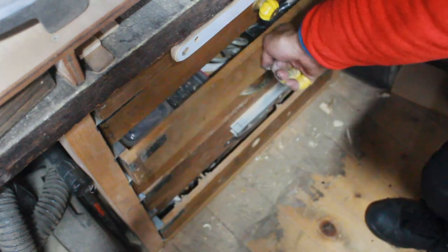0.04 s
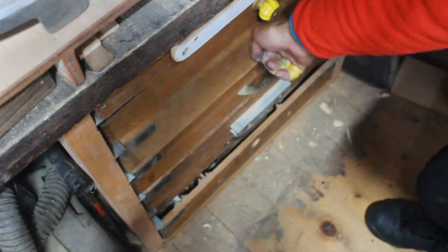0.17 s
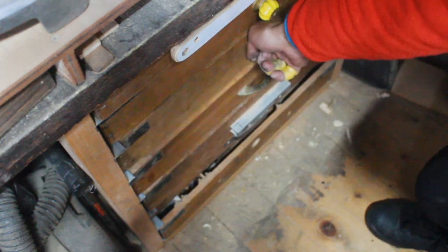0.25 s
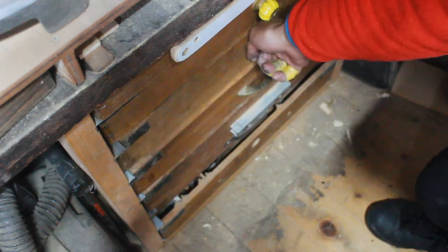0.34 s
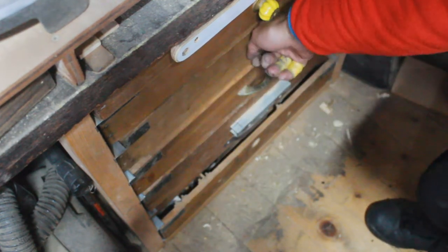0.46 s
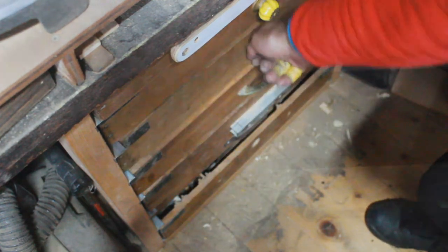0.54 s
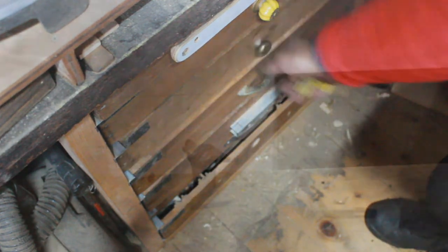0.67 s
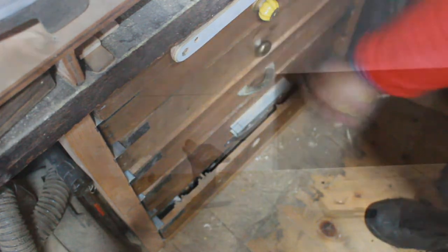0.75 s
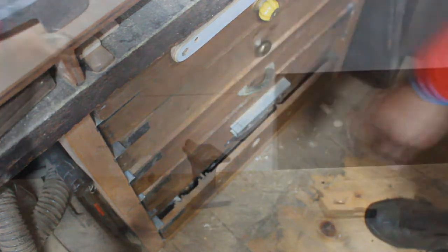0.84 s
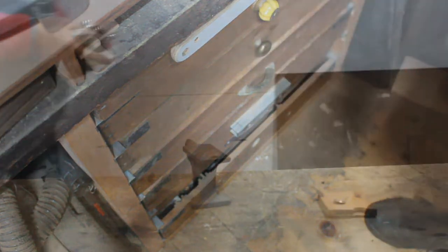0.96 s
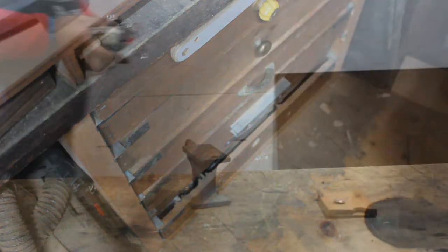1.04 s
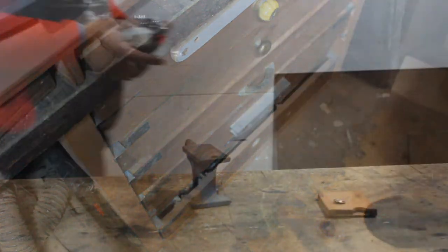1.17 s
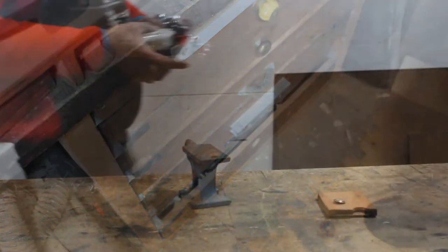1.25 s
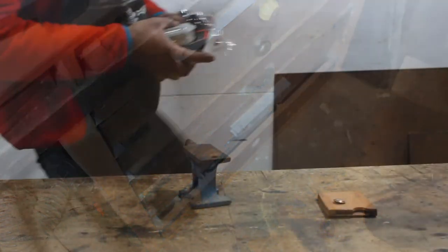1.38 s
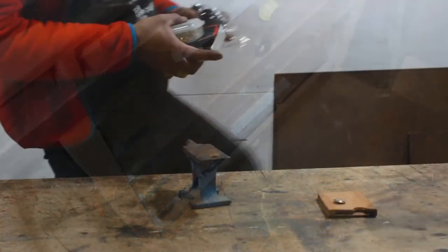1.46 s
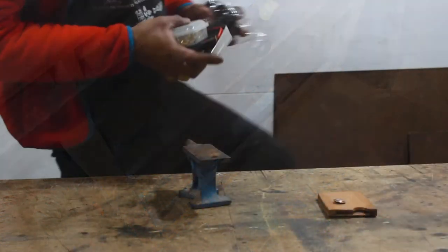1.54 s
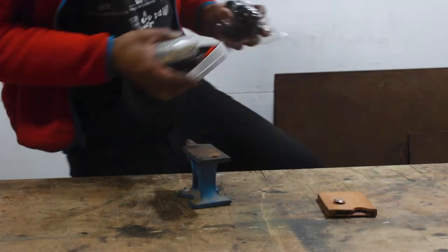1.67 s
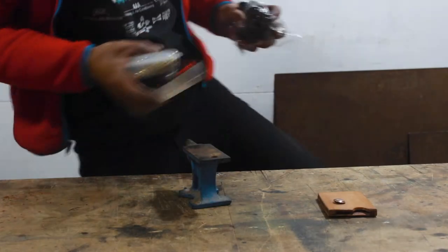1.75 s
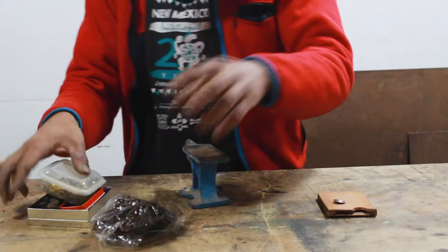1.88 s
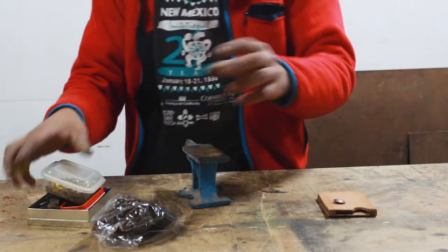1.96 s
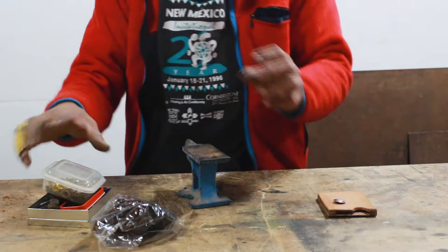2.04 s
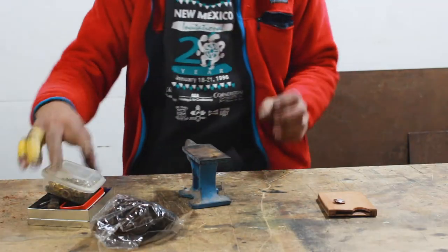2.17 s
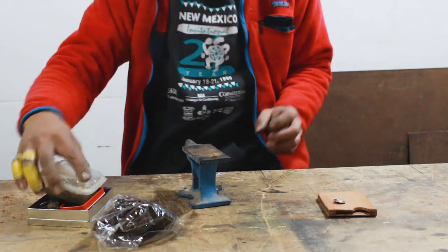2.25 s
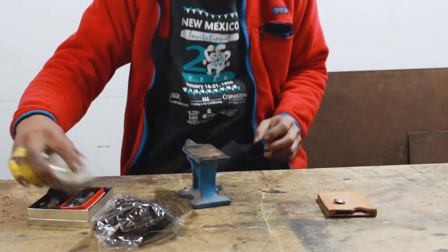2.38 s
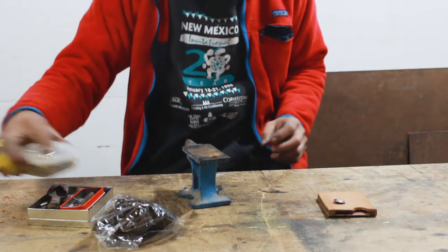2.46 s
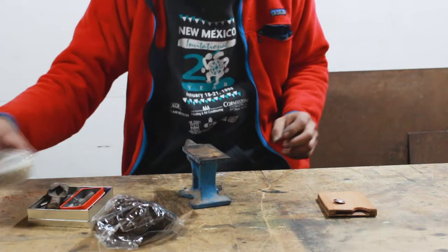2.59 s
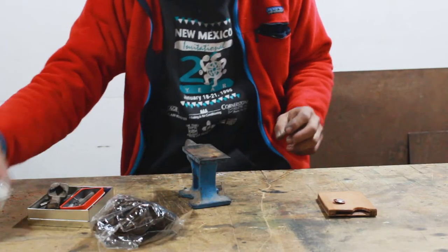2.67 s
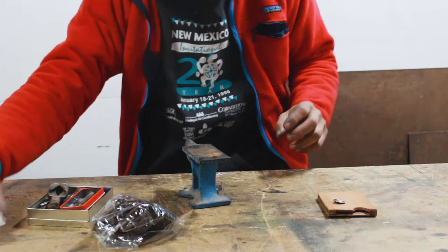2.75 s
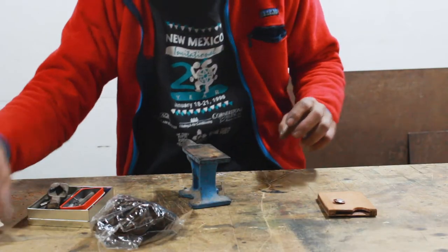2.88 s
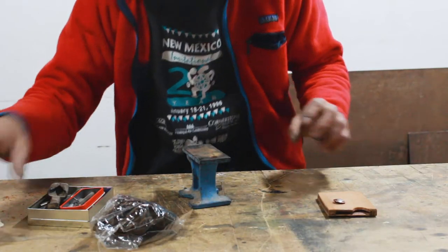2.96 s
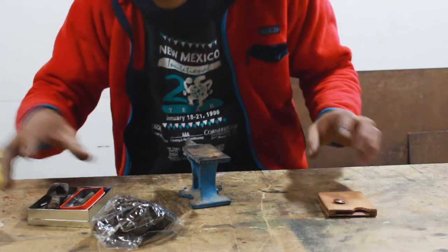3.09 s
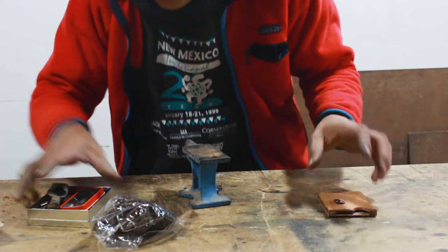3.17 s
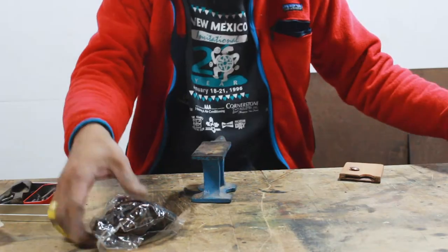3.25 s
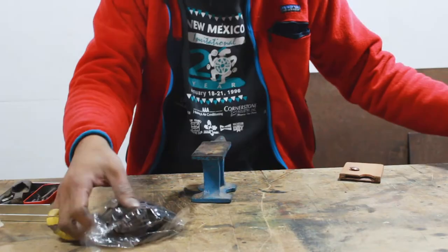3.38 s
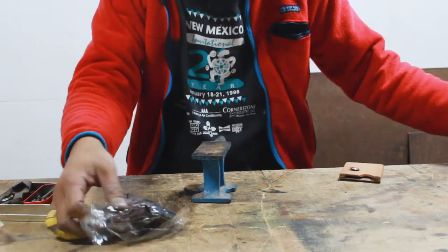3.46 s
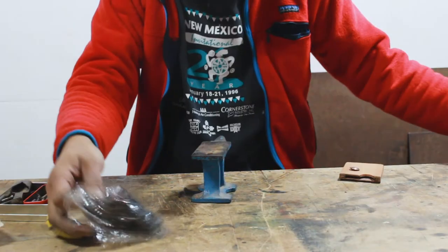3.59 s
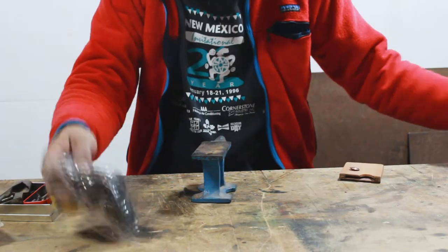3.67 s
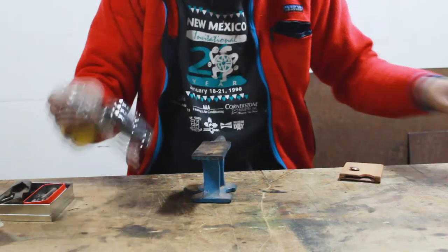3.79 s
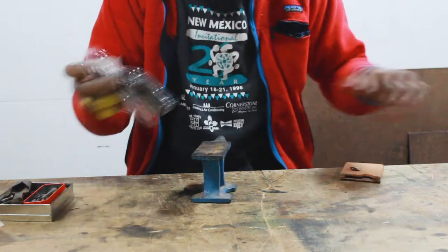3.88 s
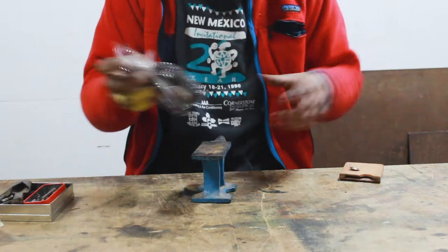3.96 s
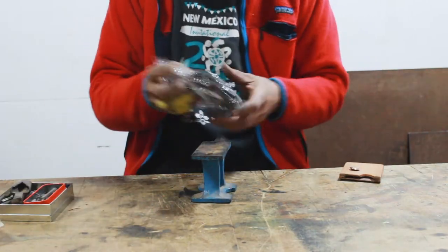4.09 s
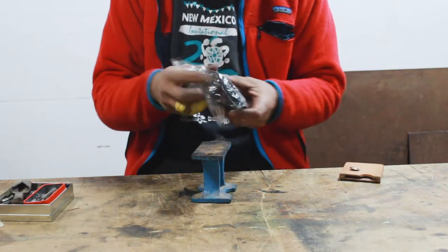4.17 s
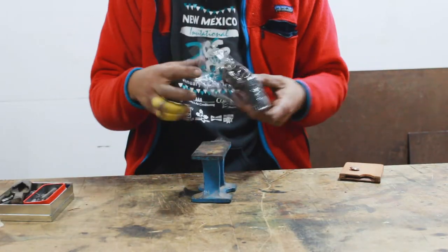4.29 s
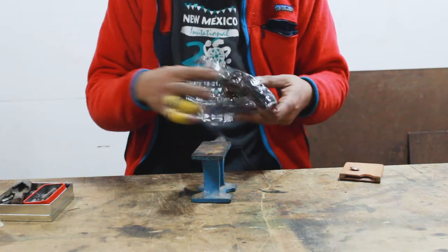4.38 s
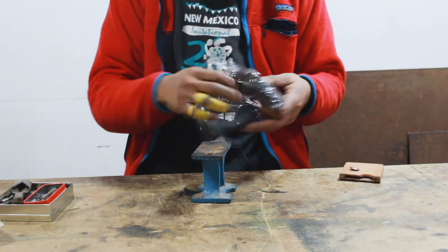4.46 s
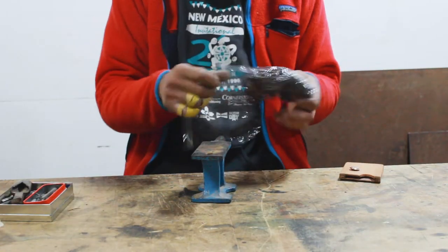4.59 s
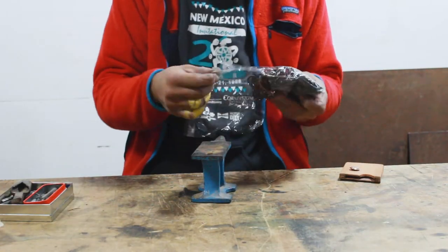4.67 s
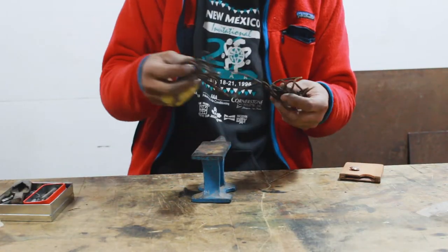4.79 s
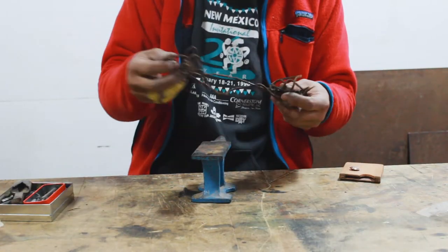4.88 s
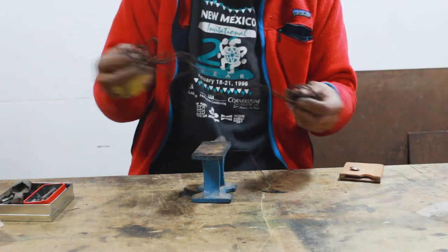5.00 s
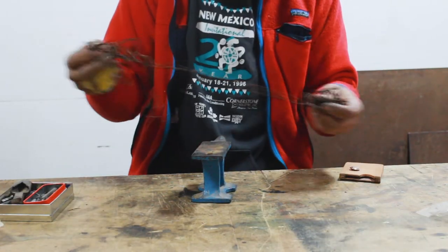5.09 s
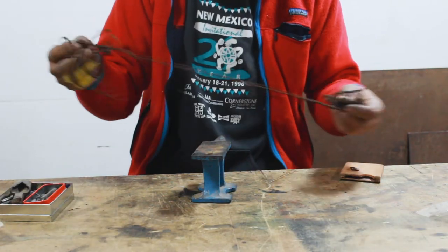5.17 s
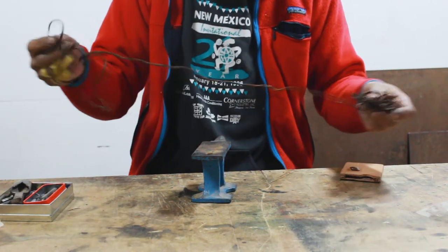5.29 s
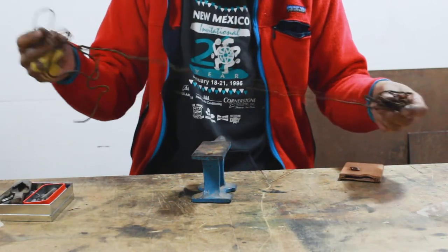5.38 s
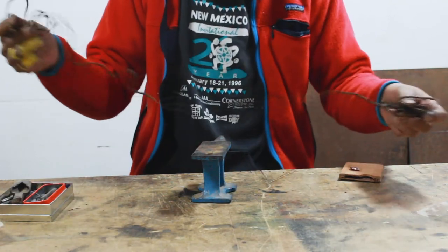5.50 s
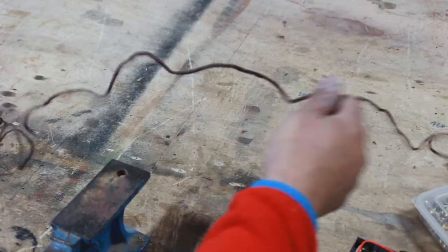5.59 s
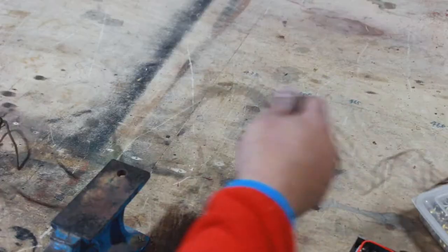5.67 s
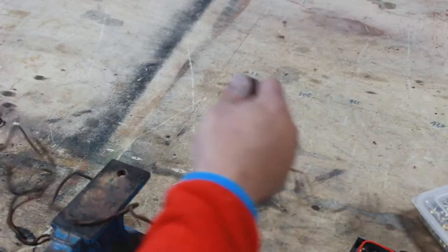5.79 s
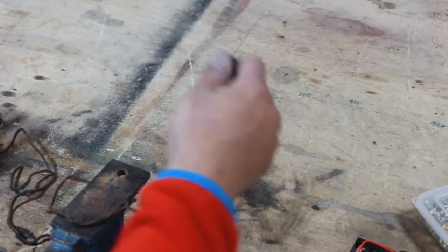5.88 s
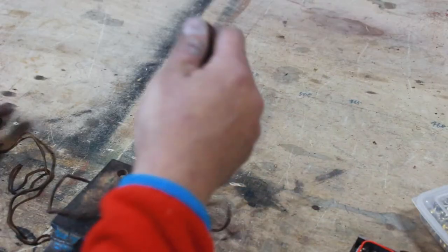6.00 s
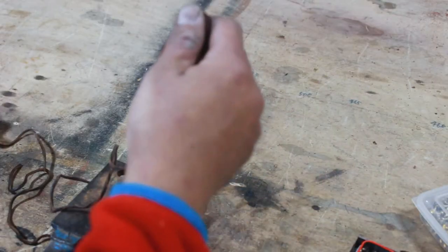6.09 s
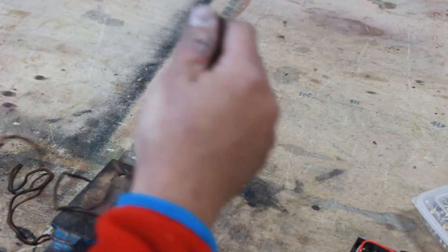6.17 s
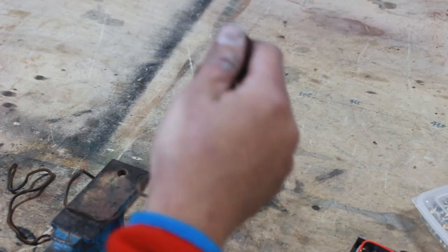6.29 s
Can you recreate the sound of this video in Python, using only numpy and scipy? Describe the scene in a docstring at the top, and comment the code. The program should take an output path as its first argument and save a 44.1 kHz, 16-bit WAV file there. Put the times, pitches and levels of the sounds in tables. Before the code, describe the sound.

A wooden drawer scrapes briefly and bumps shut, shaking the tools inside. Plastic crackles, sleeves brush and small boxes of metal parts rattle as they are set down, one hitting the workbench with a loud bang. A plastic bag is then crumpled open and stops abruptly. Last, a cord is drawn out with faint swishes and ticks. The handling sounds close, in a small workshop with low room noise.

```python
"""A small workshop. A wooden drawer scrapes along its runners and bumps shut, shaking its tools (0-0.3 s).
From 1 s plastic crackles, sleeves brush and boxes of metal parts are put down; one bangs the bench
and clips (2.8 s). After a brief dropout (3.25 s) a plastic bag is crumpled open, its creases buckling,
until crumpling and room tail stop abruptly (4.75 s). Last, a cord is drawn out and laid down.
Low room noise runs throughout."""
import sys
import numpy as np
from scipy import signal
from scipy.fft import rfft, irfft, next_fast_len
from scipy.io import wavfile
from scipy.ndimage import uniform_filter1d

SR = 44100
rng = np.random.default_rng(int(sys.argv[2]) if len(sys.argv) > 2 else 0)


def to_wav(sig):
    """Store sig (one row per channel, or 1-D mono) as 16-bit WAV at the path in sys.argv[1].

    Samples outside -1..1 are clipped; the rate is SR.
    """
    pcm = np.clip(np.atleast_2d(sig), -1, 1) * 32767
    pcm = np.round(pcm).astype(np.int16)
    wavfile.write(sys.argv[1], SR, pcm.T)  # frames by channels


N = 279594
TIME = np.arange(N) / SR
AGE = np.arange(16000) / SR  # s since an impact
DROPOUT_S, CRUMPLE_END_S = (3.252, 3.277), 4.752
TOP_HZ = 16200


def amp(db):
    """Decibels to gain."""
    return 10 ** (np.asarray(db) / 20)


def unit(x):
    """Scale to rms 1."""
    return x / np.sqrt(np.mean(x ** 2) + 1e-20)


def along(points, hz):
    """Interpolate (f/Hz, value) points on a log axis."""
    f, values = np.transpose(points)
    return np.interp(np.log(hz + 1), np.log(f + 1), values)


def colour(x, spectrum):
    """Minimum-phase filter shaped by (f/Hz, level/dB) points; output rms 1."""
    size = 4096
    gain = amp(along(spectrum, np.fft.rfftfreq(size, 1 / SR)))
    cepstrum = irfft(np.log(gain + 1e-6))
    cepstrum[1:size // 2] *= 2
    cepstrum[size // 2 + 1:] = 0
    response = irfft(np.exp(rfft(cepstrum)))
    return unit(signal.fftconvolve(x, response)[:len(x)])


def hiss(spectrum, size):
    """Coloured noise, rms 1."""
    padded = next_fast_len(size)
    gain = amp(along(spectrum, np.fft.rfftfreq(padded, 1 / SR)))
    return unit(irfft(rfft(rng.standard_normal(padded)) * gain, padded)[:size])


def fade(t60_s):
    """Free decay."""
    return np.exp(-np.log(1000) * AGE / t60_s)


def ring(modes, scatter_db, pitch=1):
    """Damped modes, strengths scattered per strike."""
    out = np.zeros(len(AGE))
    for k, (hz, db, t60_s) in enumerate(modes):
        strength = (-1) ** k * amp(db + scatter_db * rng.standard_normal())
        out += strength * fade(t60_s) * np.sin(2 * np.pi * hz * pitch * AGE)
    return out


def grains(rate_hz, spread_db, size):
    """Random micro-impacts, a few much larger than the rest."""
    chance, strength = rng.uniform(-1, 1, size), rng.standard_normal(size)
    return (np.abs(chance) < rate_hz / SR) * np.sign(chance) * amp(spread_db * np.minimum(strength, 2))


def snaps(rate_hz, spread_db, clump_db):
    """Micro-impacts in clumps of a few tens of ms; rms 1."""
    clumps = np.interp(TIME * 50, np.arange(N // 400), rng.standard_normal(N // 400))
    return unit(grains(rate_hz, spread_db, N) * amp(clump_db * clumps))


def burst(spectrum, t60_s):
    """Dying spray of micro-impacts, whitened, then coloured; initial rms about 1."""
    spray = rfft(rng.standard_normal(len(AGE)) * fade(t60_s))
    white = irfft(spray / (np.abs(spray) + 1e-12)) * fade(4 * t60_s)
    return colour(white, spectrum) * np.sqrt(np.mean(fade(t60_s) ** 2))


def add(track, t_s, sound):
    """Mix sound into track at t_s."""
    part = track[round(t_s * SR):][:len(sound)]
    part += sound[:len(part)]


# film crackle spectrum: f/Hz, level/dB
FILM_SPECTRUM = [(790, -31), (1350, -2.5), (1450, -6), (2200, -2), (3460, -3.5), (4080, -2), (9540, -10),
                 (13600, -18.5), (16000, -25.5)]
# bag body spectrum: f/Hz, level/dB
BAG_SPECTRUM = [(120, -65), (200, -12.5), (274, -4), (404, -9.5), (461, 0.5), (557, -4), (1150, -4.5),
                (1500, -51), (2530, -120)]
def crinkle():
    """Squeezed plastic snaps broadband; creases of each size buckle in clumps; the bag's body follows."""
    crackle_gain, body_gain = squeezing()
    sharp = snaps(rate_hz=170, spread_db=5, clump_db=-1)
    edges_hz = np.geomspace(1000, TOP_HZ, 6)
    creases = np.zeros(N)
    for band_hz in zip(edges_hz, edges_hz[1:]):
        band = signal.butter(2, band_hz, "band", fs=SR, output="sos")
        creases += signal.sosfilt(band, snaps(rate_hz=800, spread_db=1.5, clump_db=2.5))
    film = colour(amp(-5.5) * sharp + unit(creases), FILM_SPECTRUM)
    dense = snaps(rate_hz=2500, spread_db=4, clump_db=3.1)
    body = colour(sharp + amp(4.5) * dense, BAG_SPECTRUM)
    return amp(-2.5) * crackle_gain * film + amp(-3) * body_gain * body


# finger squeezes: t/s, hold/s, crackle level/dB, body level/dB
FILM_SQUEEZES = [(1.08, 0.027, -23.5, -33), (1.221, 0.057, -29, -33), (1.315, 0.084, -33, -37),
                 (1.443, 0.011, -39.5, -41), (2.552, 0.12, -34, -46.5), (2.68, 0.015, -34.5, -51),
                 (3.324, 0.047, -25, -38.5), (3.367, .2, -23, -36.5), (3.587, 0.13, -27, -30.5),
                 (3.708, 0.051, -25, -34.5), (3.83, .06, -32.5, -54), (3.907, 0.037, -25, -38.5),
                 (4.048, 0.012, -31.5, -44.5), (4.126, 0.046, -27.5, -38), (4.162, 0.055, -19.5, -30),
                 (4.31, 0.31, -25.5, -33), (4.453, 0.091, -21.5, -27), (4.60, 0.085, -28, -32),
                 (4.70, 0.02, -27, -30)]
def squeezing():
    """Crackle and body gains: force builds, sags as the film yields, dies on release."""
    press_s, yield_db_per_s, relax_db_per_s = 0.011, 7, 100
    crackle, body = np.zeros(N), np.zeros(N)
    for t_s, hold_s, crackle_db, body_db in FILM_SQUEEZES:
        age_s = np.maximum(TIME - t_s, 0)
        drop_db = yield_db_per_s * age_s + relax_db_per_s * np.maximum(age_s - hold_s, 0)
        force = np.minimum(age_s / press_s, 1) * amp(-drop_db)
        crackle = np.maximum(crackle, amp(crackle_db) * force)
        body = np.maximum(body, amp(body_db) * force)
    return np.array([crackle, body]) * (TIME < CRUMPLE_END_S)


# short rasps: t/s, level/dB, nominal f/Hz, t60/s
RASPS = [(1.111, -18, 4130, .059), (1.232, -25, 2850, 0.25), (1.365, -26, 2550, 0.064),
         (1.402, -34, 11900, 0.14), (2.560, -33.5, 7050, 0.17), (2.611, -31, 3530, 0.12),
         (3.693, -25, 4560, 0.12), (3.717, -19.5, 4120, 0.36), (4.670, -25, 3500, 0.041),
         (5.001, -33.5, 3300, 0.051), (5.030, -40, 4500, 0.26), (5.3, -36.5, 2490, 0.24),
         (5.457, -52, 11000, .1), (5.763, -53, 10300, .39), (6.210, -34, 2470, 0.15)]
def rasps():
    """Film, cord or small parts rasp: dense grains around one pitch."""
    out = np.zeros(N)
    for t_s, db, hz, t60_s in RASPS:
        spectrum = [(hz / 8, -40), (hz / 1.7, -13), (hz / 0.89, 0), (hz * 0.63, 0),
                    (hz * 1.83, -14), (hz * 4, -30)]
        grit = grains(rate_hz=5000, spread_db=7.9, size=len(AGE))
        add(out, t_s, amp(db) * fade(t60_s) * colour(grit, spectrum))
    return out


# sharpest snaps and taps: t/s, level/dB, bright edge level/dB
SHARP_CLICKS = [(1.0853, -12, -12), (1.111, -13, -21), (1.1505, -14, -31), (1.3817, -14, -5),
                (1.4515, -16.5, -8), (1.73, -25.5, 4), (1.8217, -27, -8), (2.2615, -23, -9),
                (2.4054, -17, -29), (2.56, -29, -10), (2.7697, -17.5, -20), (3.1311, -18.5, -5.5),
                (3.3785, -13, -12), (3.4015, -12, -24), (3.5574, -8.5, -11), (3.6033, -10.5, -20.5),
                (3.6321, -16, 4), (3.8233, -18, 7), (3.89, -20, 3), (3.9571, -13.5, 3), (4.0004, -20, -14),
                (4.6725, -13, 0), (4.711, -11.5, -3), (4.8194, -37, -21), (5.0016, -25.5, -14),
                (5.027, -22.5, -7), (5.2252, -30, -10), (5.626, -30, -25), (5.7431, -26, -23),
                (6.0227, -33.5, -7)]
def clicks():
    """Plastic snaps and small parts tap: the same slight knock under a varying bright edge."""
    out = np.zeros(N)
    for t_s, db, edge_db in SHARP_CLICKS:
        spectrum = [(100, -23), (700, -3.5), (2000, 1), (4500, -2.2),
                    (10000, edge_db), (16000, edge_db - 16)]
        add(out, t_s, amp(db - 6.5) * burst(spectrum, t60_s=0.02))
    return out


# bench top modes: f/Hz, level/dB, t60/s
BENCH_MODES = [(126, -25, 0.13), (205, -3, 0.026), (262, 0.5, 0.044), (348, -20, 0.039), (515, -3, 0.037),
               (640, -21, 0.033), (896, -5, 0.067), (1700, -17, 0.066)]
def bang():
    """The hardest landing rings the bench top under the box's dull slap."""
    slap = burst([(40, -19), (160, -8.5), (260, 1), (750, -3), (1200, -16), (4000, -32.5)], t60_s=0.056)
    bench = ring(BENCH_MODES, scatter_db=2)
    out = np.zeros(N)
    add(out, t_s=2.7962, sound=amp(4.7) * (bench + amp(-4) * slap))
    return out


# box jolts: t/s, level/dB, t60/s, tilt/(dB/octave)
BOX_JOLTS = [(1.8766, -16, 0.18, 1), (1.895, -23.5, 0.38, 0.5), (2.310, -36.5, 0.34, 2),
             (2.405, -38, 0.072, -3.5), (2.781, -22, 0.0066, 10), (2.797, -3.5, 0.007, 2),
             (2.808, -4, 0.03, 8), (2.974, -33.5, 0.051, 6)]
# loose parts spectrum: f/Hz, level/dB
PARTS_SPECTRUM = [(88, -14), (150, -6), (190, -13), (494, -10), (702, 3.5), (774, -9), (871, -1),
                  (2220, -5), (2810, -5), (10800, -32.5), (16000, -50)]
def rattles():
    """Metal parts jump and settle as their box lands."""
    out = np.zeros(N)
    for t_s, db, t60_s, db_per_octave in BOX_JOLTS:
        spectrum = [(hz, level + db_per_octave * np.log2(hz / 1000)) for hz, level in PARTS_SPECTRUM]
        add(out, t_s, amp(db) * burst(spectrum, t60_s))
    return out


# slide envelope: t/s, scrape level/dB, judder level/dB
DRAWER_SLIDE = [(0.0, -48, -33), (0.064, -40, -31.5), (0.092, -42, -24.5), (0.15, -42.5, -41),
                (0.168, -40, -34), (0.196, -42, -57), (0.215, -33, -39)]
# runner scrape spectrum: f/Hz, level/dB
SCRAPE_SPECTRUM = [(180, -30), (300, -8), (580, -1.5), (925, -13.5), (1100, -9), (2550, -14), (10100, -31),
                   (14000, -52)]
# hits on the stop: t/s, level/dB, relative tool level/dB, rise/s
DRAWER_HITS = [(0.2197, -4.5, -5, 0.0038), (0.2552, -11.5, 3.5, 0.0018), (0.2647, -9.5, -5, 0.005)]
# drawer wood modes: f/Hz, level/dB, t60/s
DRAWER_MODES = [(95.6, -8, 0.23), (132, -14, 0.1), (185, -5, 0.11), (231, 7, 0.055), (305, -4, .1),
                (333, -6, 0.081), (438, 5, 0.055), (515, -11, 0.085), (655, -12, 0.061), (960, -14, 0.068),
                (1680, -6, 0.053)]
# shaken tools spectrum: f/Hz, level/dB
TOOLS_SPECTRUM = [(100, -12), (250, 3), (520, 1), (750, -9), (1100, -8), (1750, -11.5), (2300, -20),
                  (5500, -33), (14000, -53)]
def drawer():
    """Wood scrapes and judders on its runners, hits the stop and shakes the tools inside."""
    times_s, *levels_db = np.transpose(DRAWER_SLIDE)
    scrape_gain, judder_gain = [amp(np.interp(TIME, times_s, db, right=-120)) for db in levels_db]
    scrape = colour(grains(rate_hz=3000, spread_db=1.3, size=N), SCRAPE_SPECTRUM)
    judder = hiss([(100, -51), (205, -5), (237, 3), (270, -13), (500, -50), (1000, -100)], N)
    out = amp(3) * scrape_gain * scrape + amp(-3) * judder_gain * judder
    for t_s, db, tools_db, rise_s in DRAWER_HITS:
        wood = amp(-5.5) * ring(DRAWER_MODES, scatter_db=0.5)
        tools = amp(tools_db - 0.5) * fade(t60_s=0.14) * hiss(TOOLS_SPECTRUM, len(AGE))
        attack = 1 - np.exp(-AGE / rise_s)
        add(out, t_s, amp(db) * (wood + tools) * attack)
    return out


# steel touches: t/s, level/dB, pitch ratio, relative contact level/dB
STEEL_TOUCHES = [(.565, -43.5, .81, -18), (1.628, -27, 1.0, 3.5), (3.722, -29, 2, 0), (5.301, -34, .99, 9)]
# steel modes at pitch ratio 1: f/Hz, level/dB, t60/s
STEEL_MODES = [(1770, -27, 0.18), (2560, -6, 0.02), (2980, -2, 0.079), (3160, -10, 0.079), (4200, -21, .06),
               (5360, -13, .04)]
def clinks():
    """Small steel pieces ring briefly after a sharp contact."""
    out = np.zeros(N)
    for t_s, db, pitch, contact_db in STEEL_TOUCHES:
        contact = amp(contact_db) * burst([(300, 0), (2500, 0.5), (7000, -11), (16000, -41)], t60_s=0.0057)
        steel = amp(-5) * ring(STEEL_MODES, scatter_db=2.5, pitch=pitch)
        add(out, t_s, amp(db) * (steel + contact))
    return out


# soft contacts: t/s, level/dB, centre f/Hz
SOFT_CONTACTS = [(.398, -36.5, 312), (.564, -38.5, 310), (1.379, -37, 172), (1.465, -32.5, 188),
                 (1.557, -36, 206), (1.877, -30, 132), (2.312, -37, 266), (2.336, -34, 129),
                 (3.247, -28, 370), (3.278, -39.5, 457), (6.069, -38.5, 260)]
def thuds():
    """Hands, feet and boxes give low, quickly damped knocks."""
    out = np.zeros(N)
    for t_s, db, hz in SOFT_CONTACTS:
        spectrum = [(hz / 4, -25), (hz / 1.8, -7), (hz, 0), (hz * 1.5, -10), (hz * 5, -28), (hz * 30, -60)]
        add(out, t_s, amp(db + 4) * burst(spectrum, t60_s=0.13))
    return out


# strokes: peak t/s, half length/s, swish level/dB, rub level/dB
BRUSH_STROKES = [(.5, 0.1, -73, -48), (1.017, 0.29, -51, -55), (1.49, 0.15, -62, -46.5),
                 (1.783, 0.14, -60.5, -46.5), (2.125, 0.25, -46, -48), (2.52, 0.18, -51.5, -52.5),
                 (4.982, 0.071, -57, -56), (5.23, 0.069, -52, -58), (5.47, 0.033, -55, -59),
                 (5.642, 0.038, -49.5, -49.5), (5.744, 0.053, -48.5, -48), (5.884, 0.084, -54, -53),
                 (6.156, 0.065, -44, -49), (6.278, .06, -52.5, -55)]
# cloth swish spectrum: f/Hz, level/dB
SWISH_SPECTRUM = [(500, -21), (1000, 2), (2500, -2.5), (5000, -5.5), (10000, -13.5), (16000, -31)]
# dull rub spectrum: f/Hz, level/dB
RUB_SPECTRUM = [(90, -25), (170, -7), (300, 1), (500, -3.5), (850, -8.5), (1500, -50)]
def brushing():
    """Sleeves, fingers and cord slide, speeding up and slowing: fine grain over a dull rub."""
    swish_gain, rub_gain = np.zeros(N), np.zeros(N)
    for t_s, half_length_s, swish_db, rub_db in BRUSH_STROKES:
        speed = np.exp(-((TIME - t_s) / half_length_s) ** 2)
        swish_gain += amp(swish_db) * speed
        rub_gain += amp(rub_db) * speed
    swish = colour(grains(rate_hz=4000, spread_db=2.3, size=N), SWISH_SPECTRUM)
    return swish_gain * swish + rub_gain * hiss(RUB_SPECTRUM, N)


# workshop decay: f/Hz, t60/s
ROOM_DECAY = [(100, 0.23), (300, 0.39), (800, 0.48), (2500, 0.45), (6000, 0.43), (14000, 0.17)]
def room(x):
    """Wall reflections: a short diffuse tail, drawn afresh per block so no fixed pitches ring."""
    size = 8000
    blocks = np.pad(x, (0, -N % size)).reshape(-1, size)
    hz, t_s, noise = signal.stft(rng.standard_normal((len(blocks), len(AGE))), SR, nperseg=256)
    decay = np.exp(-np.log(1000) * t_s / along(ROOM_DECAY, hz)[:, None])
    tails = signal.istft(noise * decay, SR, nperseg=256)[1][:, :len(AGE)]
    tails *= 1 - np.exp(-AGE / 0.0013)  # reflections build up
    tails /= np.linalg.norm(tails, axis=1, keepdims=True)
    out = np.zeros(N)
    for k, echo in enumerate(signal.fftconvolve(blocks, tails, axes=1)):
        add(out, k * size / SR, echo)
    return out


# still workshop spectrum: f/Hz, level/dB
BACKGROUND_SPECTRUM = [(20, -18), (42, -12.5), (70, 1), (120, -5.5), (180, -11.5), (300, -16), (600, -24.5),
                       (1200, -30), (2500, -31.5), (6000, -37.5), (16000, -49)]
def background():
    """Low room noise, quieter from the dropout to the end of the crumpling."""
    dip_db = 4.8 * ((TIME > DROPOUT_S[0]) & (TIME < CRUMPLE_END_S))
    return amp(-43 - dip_db) * hiss(BACKGROUND_SPECTRUM, N)


def scene():
    """All handling in one room, muted during the dropout, over the background."""
    wood, film = drawer(), crinkle() + rasps()
    parts, blow, knocks = rattles(), bang(), thuds()
    taps = clicks() + clinks()
    direct = wood + film + parts + blow + knocks + taps + brushing()
    send = (amp(-9.5) * wood + amp(-10) * film + amp(-7) * parts
            + amp(-15.5) * blow + amp(-2.5) * knocks + amp(-1.5) * taps)
    early = TIME < CRUMPLE_END_S
    echo = early * room(send * early)  # tail stops with the crumpling
    echo += amp(0.5) * room(send * ~early)
    audible = (TIME < DROPOUT_S[0]) | (TIME > DROPOUT_S[1])
    gate = uniform_filter1d(1.0 * audible, size=90)  # 2 ms ramps
    return (direct + echo) * gate + background()


def record(dry):
    """Clip at full scale, then remove everything above TOP_HZ."""
    clipped = np.clip(dry, -1, 1)
    size = next_fast_len(N + SR // 2)
    passband = np.fft.rfftfreq(size, 1 / SR) < TOP_HZ
    return irfft(rfft(clipped, size) * passband, size)[:N]


dry = scene()
out = record(dry)
to_wav(out)
```